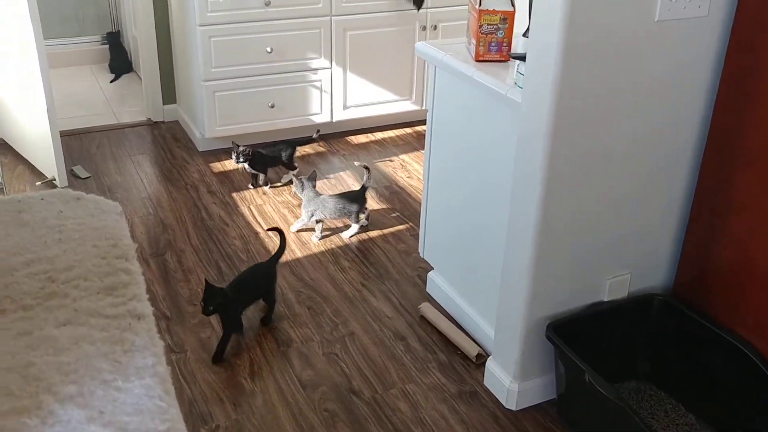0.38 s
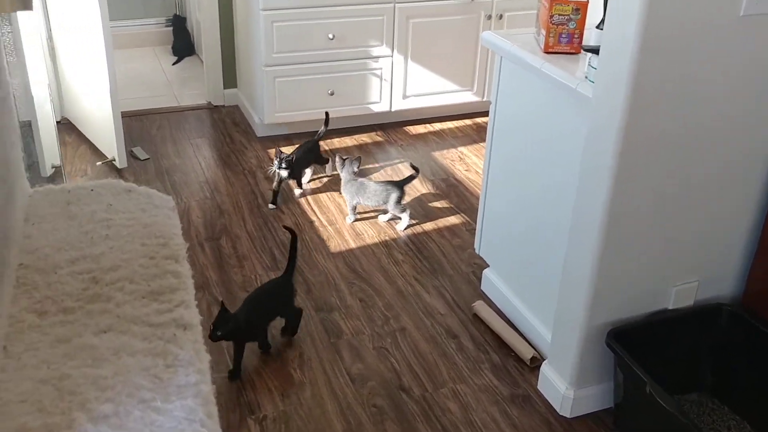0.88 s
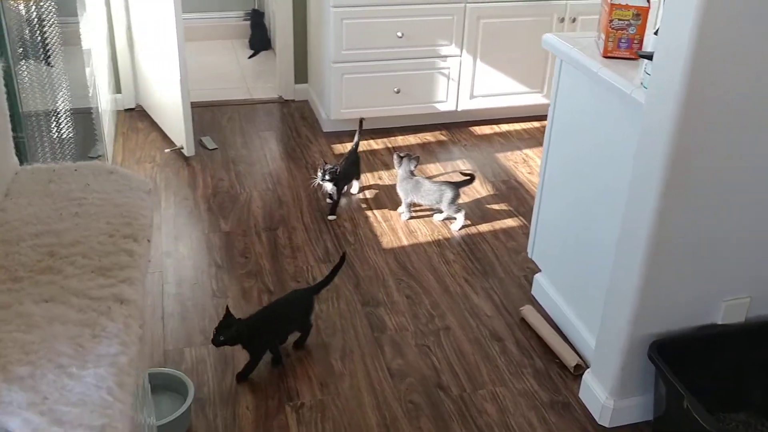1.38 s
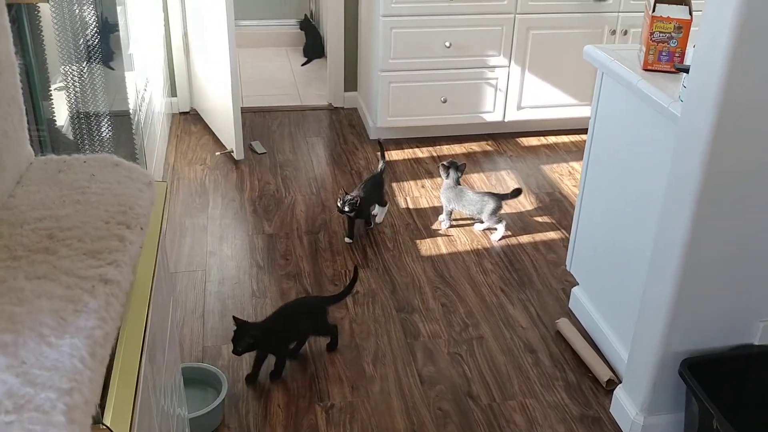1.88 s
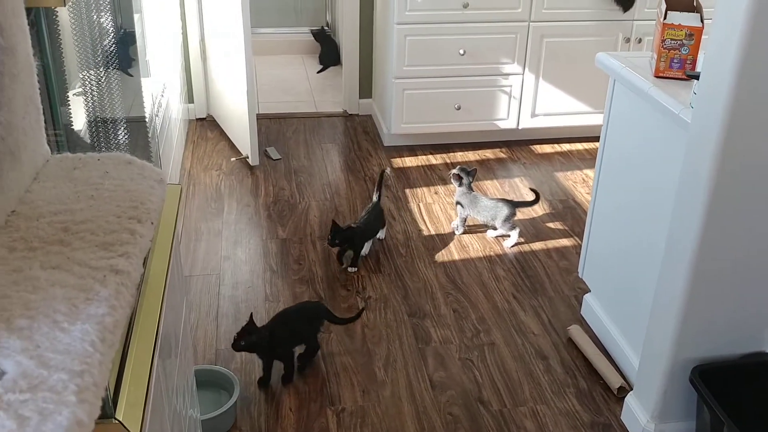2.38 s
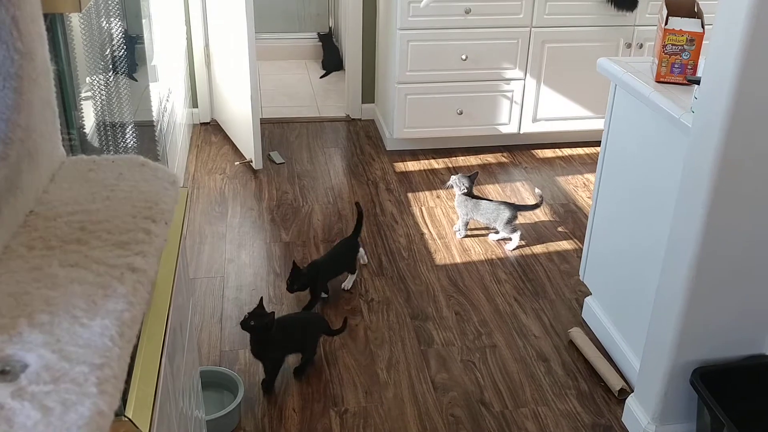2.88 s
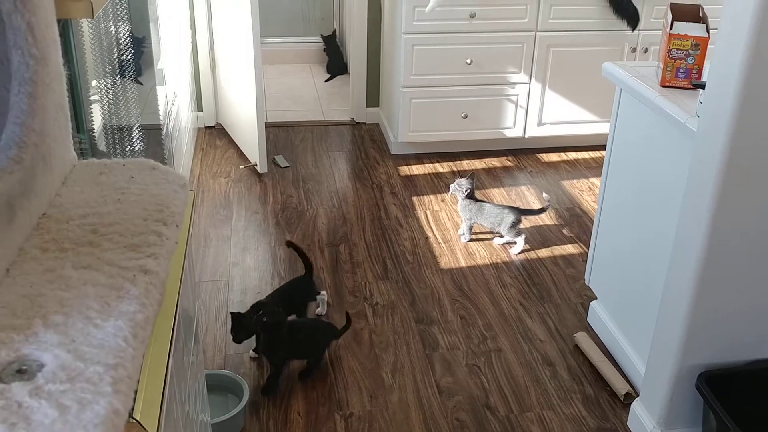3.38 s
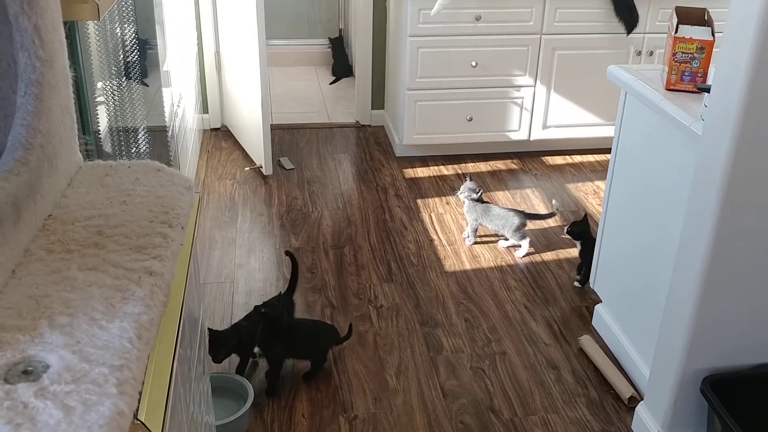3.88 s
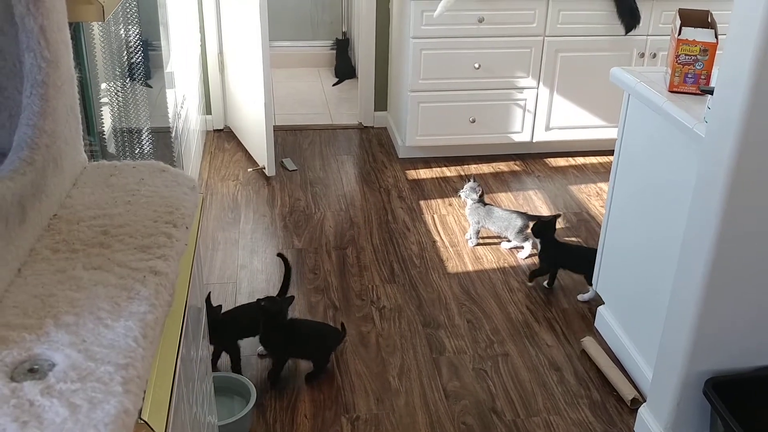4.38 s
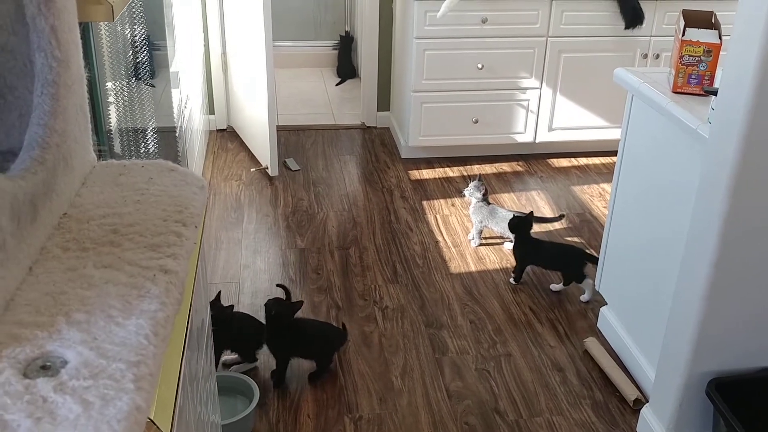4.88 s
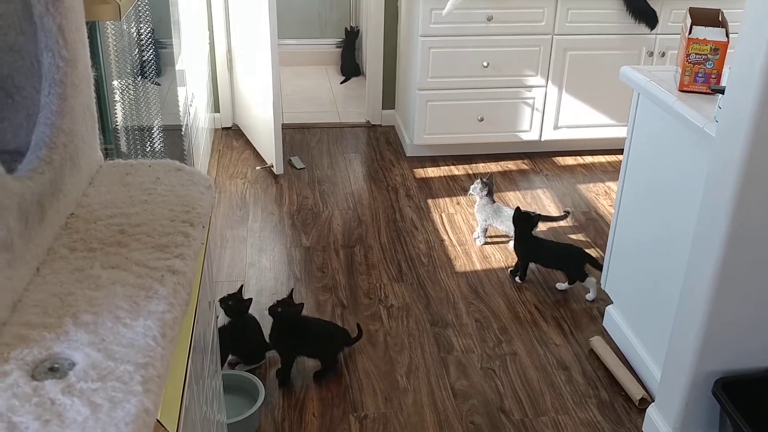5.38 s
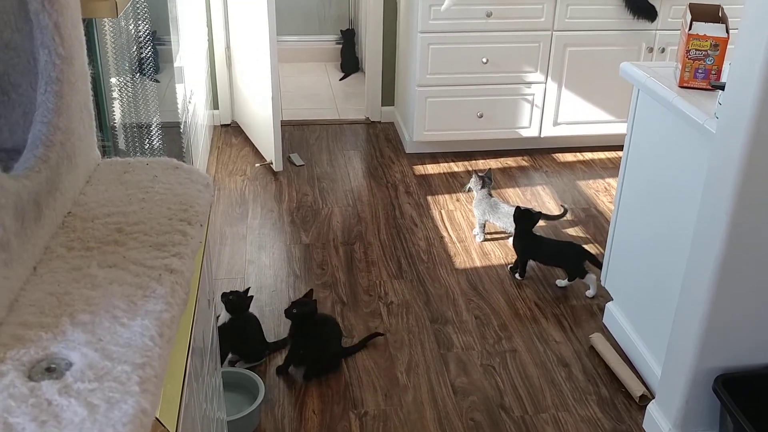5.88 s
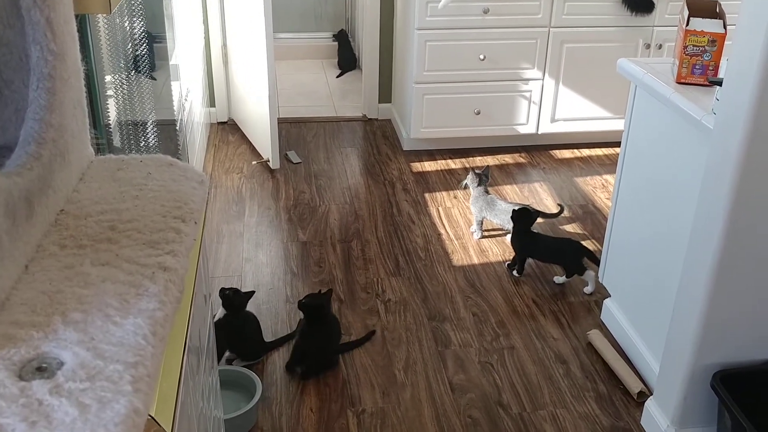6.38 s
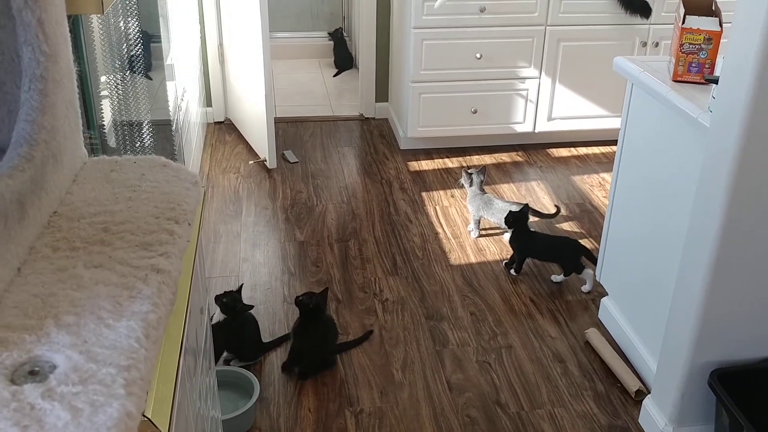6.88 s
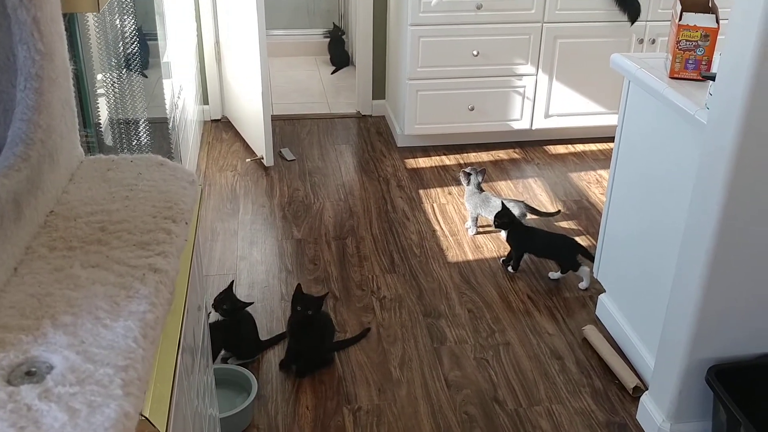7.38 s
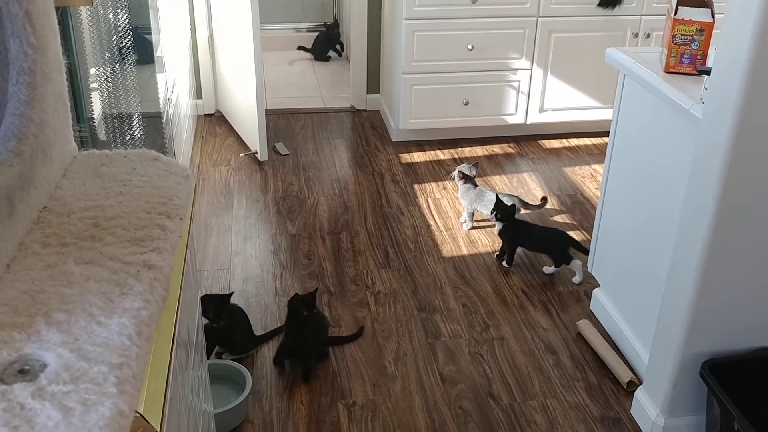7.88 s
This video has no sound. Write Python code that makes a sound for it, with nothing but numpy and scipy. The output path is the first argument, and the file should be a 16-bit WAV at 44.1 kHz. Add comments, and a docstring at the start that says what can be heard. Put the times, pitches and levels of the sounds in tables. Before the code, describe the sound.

In a bare, echoing kitchen, kittens patter over hard flooring with bright, light claw ticks and soft paw scuffs that thin out. A sudden heavy wooden knock booms through the floor, followed by a short clatter. After a quiet gap comes a second, weaker clatter, then five quick squeaky lip kisses. A handheld stereo microphone at some distance picks up mostly room reflections over low, quiet room tone.

```python
"""Kittens pad across a hard laminate floor in a bare kitchen; claws tick and paws scuff, each a flurry of clicks.
Soft paw thuds and hard wood knocks are clicks too; a heavy knock rings the floor, a door part clatters twice.
Five short squeaky kisses, probably lips calling the kittens, are dragged-out clicks through three resonances.
All these contacts are heard mostly through the room's echoes.
Behind them lie a faint noise rustle, a low rumble with bumps, and a steady noise room tone."""
import sys
import numpy as np
from scipy import signal
from scipy.fft import rfft, irfft, next_fast_len
from scipy.io import wavfile
from scipy.ndimage import uniform_filter1d

SR = 44100
rng = np.random.default_rng(int(sys.argv[2]) if len(sys.argv) > 2 else 0)


def materialize(psi):
    """Save the field psi as 16-bit PCM at rate SR to the path in sys.argv[1].

    A 1-D psi becomes a single channel; in a 2-D psi each row is a channel.
    """
    bounded = np.clip(np.atleast_2d(psi).T, -1, 1)
    quanta = np.round(bounded * 32767).astype(np.int16)
    wavfile.write(sys.argv[1], SR, quanta)


N = 352359   # length in samples
LEAD_IN = 512   # samples of silence ahead of each room response, so that filters start cleanly


def from_db(db):
    """Decibels to gain."""
    return 10 ** (np.asarray(db) / 20)


def rms_one(x):
    """Scale to rms 1."""
    return x / np.sqrt(np.mean(x ** 2) + 1e-20)


def at_hz(points, hz):
    """Read a table on a log-frequency axis."""
    table_hz, value = np.array(points).T
    return np.interp(np.log(hz + 1), np.log(table_hz), value)


def in_time(rows):
    """Read a curve at every sample."""
    s, value = np.transpose(rows)
    return np.interp(np.arange(N) / SR, s, value)


def coloured(x, spectrum):
    """Give a sound the colour of a spectrum table."""
    length = x.shape[-1]
    size = next_fast_len(length + 4096)
    hz = np.arange(size // 2 + 1) * SR / size
    return irfft(rfft(x, size) * from_db(at_hz(spectrum, hz)), size)[..., :length]


# How alike left and right are. Each row: frequency in Hz, correlation from -1 to 1.
LEFT_RIGHT_LIKENESS = [(100, 0.91), (250, 0.83), (500, 0.56), (1000, -0.085), (3000, -0.061),
                       (12000, -0.11)]


def stereo(mid, side):
    """Two unrelated sounds become a pair that is alike in the bass and nearly unrelated in the treble."""
    alike = [(hz, np.clip(c, -.99, .995)) for hz, c in LEFT_RIGHT_LIKENESS]
    mid = coloured(mid, [(hz, 10 * np.log10(1 + c)) for hz, c in alike])
    side = coloured(side, [(hz, 10 * np.log10(1 - c)) for hz, c in alike])
    return np.array([mid + side, mid - side]) / np.sqrt(2)


def steady(spectrum):
    """Stereo noise of a given colour, rms 1."""
    return rms_one(stereo(*coloured(rng.standard_normal((2, N)), spectrum)))


# How long the room rings. Each row: frequency in Hz, time to fall 60 dB in seconds.
ROOM_DECAY = [(250, 0.54), (1000, 0.38), (2000, 0.39), (3300, 0.34), (5000, .33), (9000, 0.28)]
# Walls and ceiling. Each row: shortest delay in seconds, level in dB over the direct level.
WALL_ECHOES = [(.008, -10.5), (0.018, -8.5), (0.0183, -4.5), (0.0208, 0), (.027, 0)]


def room_response(direct_db):
    """Direct sound and a few clear echoes, with a dense wash that piles up and dies, treble first."""
    buildup_s, grain_db = 0.0055, 3
    t = np.arange(SR // 2) / SR
    spikes = np.minimum(rng.exponential(1, len(t)), 4)
    grain = from_db(grain_db * spikes * np.exp(-t / 0.034))   # roughest at the start
    echoes = rng.standard_normal((2, len(t))) * grain
    wash = 0
    edges = 40 * 2 ** np.arange(0, 9.1, 1 / 3)   # third octaves, Hz
    for low, high in zip(edges, edges[1:]):
        band = signal.sosfilt(signal.butter(2, [low, high], "band", fs=SR, output="sos"), echoes)
        wash = wash + band * from_db(-60 * t / at_hz(ROOM_DECAY, np.sqrt(low * high)))
    spectrum = rfft(wash * (1 - np.exp(-t / buildup_s)))
    smooth_power = uniform_filter1d(np.abs(spectrum) ** 2, size=50)
    out = irfft(spectrum / np.sqrt(smooth_power), len(t))   # no colour of its own
    out *= np.clip((t[-1] - t) * 20 - 1, 0, 1)   # the wash fades out fully
    for delay, db in [(0.00047, 0.0095)] + list(WALL_ECHOES):   # the direct sound comes first
        lags = np.round((delay + 0.0011 * rng.random(2)) * SR).astype(int)
        out[[0, 1], lags] += from_db(direct_db + db) * rng.choice([-1, 1], 2)
    return stereo(*np.pad(out, [(0, 0), (LEAD_IN, 0)]))


def contacts(seconds, db, lengths, dragged=False):
    """Each contact is a flurry of tiny clicks, dying away or dragged out, with a set total energy."""
    out = np.zeros(N + 8192)
    t = np.arange(8192) / SR   # no contact outlasts this
    clicks_per_s = 9000 if dragged else 2500
    for s, level_db, length in zip(seconds, db, lengths):
        clicks = rng.standard_normal(len(t)) * (rng.random(len(t)) < clicks_per_s / SR)
        clicks[0] = 1
        if dragged:
            shape = np.clip(1 - (t / length) ** 3, 0, 1)
        else:
            shape = np.exp(-t / max(length, .0005))
        spectrum = rfft(clicks * shape)
        smooth_power = uniform_filter1d(np.abs(spectrum) ** 2, size=24)
        clicks = irfft(spectrum / np.sqrt(smooth_power)) * (shape > .001)   # even in colour
        at = round(s * SR)
        out[at:at + len(t)] += from_db(level_db) * clicks / np.sqrt(np.sum(clicks ** 2))
    return out[:N]


# Treble colour of the microphone. Each row: frequency in Hz, gain in dB.
MICROPHONE_COLOUR = [(6000, 7), (7200, 5.5), (8700, 15), (9500, 7.5), (10600, -23.5), (11600, -11),
                     (13000, -8), (16000, -11)]


def in_room(source, spectrum, room):
    """Colour and echoes; a unit click reaches rms 1 over its loudest 10 ms."""
    response = coloured(coloured(room, spectrum), MICROPHONE_COLOUR)
    loudest = np.sqrt(uniform_filter1d(np.mean(response ** 2, axis=0), size=441).max())
    return signal.fftconvolve(source[None], response / loudest, axes=1)[:, LEAD_IN:LEAD_IN + N]


def struck(seconds, lengths, layers, direct_db, count):
    """Contacts are dealt in turn to several places in the room, each with echoes of its own."""
    out = 0
    for place in range(count):
        room = room_response(direct_db)
        mine = slice(place, None, count)
        for db, spectrum in layers:
            clicks = contacts(seconds[mine], db[mine], lengths[mine])
            out = out + in_room(clicks, spectrum, room)
    return out


STEP_DIRECT_DB = -10.5   # direct sound against the wash, for steps and scuffs
# Claw and paw colours. Each row: frequency in Hz, relative level in dB per Hz.
CLAW_COLOUR = [(1200, -46), (1900, -12), (2700, -2), (4500, 2), (7000, 5), (10000, 8), (12500, 7),
               (16000, 1.5)]
PAW_COLOUR = [(400, -2), (1000, -5), (2000, 1.5), (3500, -6), (6000, -14), (10000, -45)]
# Footfalls and a few strong early echoes of them, each row one tick and scuff.
# Each row: start in seconds, claw tick in dB, paw scuff in dB.
TICKS_AND_SCUFFS = [(0.071, -48, -61), (0.0933, -45, -84), (0.3535, -36.5, -55), (0.6768, -39.5, -61),
                    (0.87, -68, -78), (0.941, -52, -69), (0.9627, -41.5, -62), (1.236, -66.5, -71),
                    (1.288, -39.5, -62), (1.574, -38, -57), (1.8267, -54, -64), (1.8667, -50, -64),
                    (2.152, -61, -65), (2.201, -50.5, -44.5), (2.421, -56, -61), (3.073, -54, -88),
                    (3.1571, -89, -55.5), (3.262, -63, -68), (3.463, -48, -57), (3.482, -45, -49.5),
                    (3.759, -61.5, -80), (4.233, -61.5, -72.5), (4.926, -43.5, -47), (5.364, -64.5, -61.5),
                    (5.639, -54, -68)]


def steps():
    """A bright claw tick and a duller paw scuff sound together in each row, both dying in about 2 ms."""
    s, claw_db, paw_db = np.transpose(TICKS_AND_SCUFFS)
    decay_s = np.full(len(s), 0.0022)
    layers = [(claw_db, CLAW_COLOUR), (paw_db, PAW_COLOUR)]
    return struck(s, decay_s, layers, STEP_DIRECT_DB, count=4)


# Paws dragged over the boards.
# Each row: start in seconds, bright part in dB, dull part in dB, length in seconds (cut at 0.186).
PAW_DRAGS = [(0.323, -55, -61, 0.033), (0.348, -38.5, -62, 0.06), (0.583, -64, -59.5, 0.085),
             (0.818, -64, -58.5, 0.17), (1.554, -53, -62, 0.021), (2.42, -55.5, -49, 0.12),
             (2.526, -76, -70, 0.026), (2.861, -63, -64.5, 0.22), (3.071, -66, -58, 0.12),
             (3.159, -89, -62, 0.049), (3.811, -71, -62, 0.027), (4.48, -58, -71, 0.13),
             (4.927, -44.5, -51.5, 0.046), (6.754, -58, -45, 0.057)]


def scuffs():
    """A paw sliding on the floor: the same colours as a step, drawn out."""
    s, bright_db, dull_db, length = np.transpose(PAW_DRAGS)
    room = room_response(STEP_DIRECT_DB)
    bright = in_room(contacts(s, bright_db, length, dragged=True), CLAW_COLOUR, room)
    dull = in_room(contacts(s, dull_db, length, dragged=True), PAW_COLOUR, room)
    return bright + dull


# Mid clatter, hollow part and bright edge. Each row: frequency in Hz, relative level in dB per Hz.
CLATTER_COLOUR = [(400, 0.5), (800, -1), (1500, 8.5), (2400, 3.5), (3500, -7), (6000, -29), (10000, -37)]
HOLLOW_COLOUR = [(150, -37), (250, -7.5), (330, 4), (440, 10), (560, -1), (800, 4), (1200, -4),
                 (2000, -23.5)]
EDGE_COLOUR = [(2000, -11.5), (4000, 2.5), (9000, -7.5), (11000, -12)]
# Soft hollow paw thuds, then a faint clatter and hard knocks on wood. Each row: start in seconds,
# clatter in dB, hollow part in dB, bright part in dB, decay constant of the contact in seconds.
THUDS_AND_KNOCKS = [(2.533, -64.5, -56.5, -80, 0.006), (3.165, -62, -54, -83, 0.0069),
                    (3.844, -57, -67, -83, 0.0051), (4.7125, -23.5, -30, -32.5, 0.0053),
                    (4.745, -28.5, -37, -44, 0.031), (5.097, -31, -41, -45.5, 0.011),
                    (5.1326, -38.5, -43, -67, 0.016), (5.168, -34, -41.5, -64, 0.0068),
                    (6.685, -36.5, -43, -62, 0.008), (6.724, -42, -48.5, -57, 0.0044),
                    (6.747, -44, -48.5, -49.5, 0.0071)]


def thuds_and_knocks():
    """Paw thuds and wood on wood share three colours, mid, hollow and bright, under strong echoes."""
    s, clatter_db, hollow_db, bright_db, decay_s = np.transpose(THUDS_AND_KNOCKS)
    layers = [(clatter_db, CLATTER_COLOUR), (hollow_db, HOLLOW_COLOUR), (bright_db, EDGE_COLOUR)]
    # little direct sound: the knocks come from round a corner
    return struck(s, decay_s, layers, direct_db=-15.5, count=3)


# Low resonances of the floor. Each row: frequency in Hz, relative level in dB, time to fall 60 dB in seconds.
FLOOR_RESONANCES = [(58.5, -7, 0.39), (75.7, 6, 0.082), (126.4, -2.5, 0.26), (149.2, 5, 0.21),
                    (205, -5, 0.37), (263, -9.5, 0.38), (304.4, -13, 0.43)]
# Pushes on the floor; the heavy knock lands in stages.
# Each row: start in seconds, strength in dB, push length in seconds.
FLOOR_PUSHES = [(0.232, -29, 0.02), (0.254, -44, 0.017), (4.708, -20.5, 0.0051), (4.716, -18, 0.006),
                (4.724, -11, 0.0045), (5.105, -52, 0.0037), (6.691, -50, 0.0066)]


def thumps():
    """Soft pushes set the low floor modes ringing, nearly alike in both ears."""
    push, out = np.full(N, 1e-18), 0
    for s, db, length in FLOOR_PUSHES:
        shape = np.hanning(max(round(length * SR), 3))
        at = round(s * SR)
        push[at:at + len(shape)] -= from_db(db) * shape / shape.sum()
    for hz, db, t60 in FLOOR_RESONANCES:
        r, w = from_db(-60 / (t60 * SR)), 2 * np.pi * hz / SR   # loss per sample, radians per sample
        ringing = signal.lfilter([0, np.sin(w)], [1, -2 * r * np.cos(w), r * r], push)
        out = out + from_db(db) * ringing
    # the microphone drops the deepest bass
    out = signal.sosfilt(signal.butter(6, 50, "high", fs=SR, output="sos"), out)
    side = from_db(-20.5) * np.roll(out, 90)   # a faint late copy, opposite in the two ears
    return out + side * [[1], [-1]]


# Overall tilt of the kisses. Each row: frequency in Hz, relative level in dB per Hz.
KISS_TILT = [(500, -8.5), (1800, -7.5), (2400, -5.5), (9000, 1), (10500, -7)]
# Five short squeaky kisses. Each row: start in seconds, level in dB, first resonance in Hz,
# second resonance in Hz, second level in dB and third level in dB against the first, before the tilt.
KISSES = [(6.927, -36, 3020, 5700, -5, -30), (7.091, -30.5, 2930, 5230, -5.5, -18.5),
          (7.262, -32, 3050, 5430, -3, -16.5), (7.405, -33, 2890, 5750, -14.5, -27),
          (7.569, -29.5, 3210, 5640, -8, -12)]


def kisses():
    """Squeaky kisses, probably lips calling the kittens: bursts of clicks through three resonances."""
    width_hz, third_over_second, length_s = 810, 1.474, 0.016
    hiss_db = -23.5   # what escapes between the resonances
    out, hz = 0, np.geomspace(300, 16000, 120)
    for s, db, first_hz, second_hz, second_db, third_db in KISSES:
        resonances = [(first_hz, 0), (second_hz, second_db), (third_over_second * second_hz, third_db)]
        peaks = sum(from_db(d) / (1 + np.abs(2 * (hz - centre) / width_hz) ** 2.2)
                    for centre, d in resonances)
        colour = 20 * np.log10(peaks + from_db(hiss_db)) + at_hz(KISS_TILT, hz)
        burst = contacts([s], [db], [length_s], dragged=True)
        out = out + in_room(burst, np.transpose([hz, colour]), room_response(direct_db=-31))
    return out


# Faint rustle while the animals move. Each row: time in seconds, level in dB.
RUSTLE_LEVEL = [(0.0, -92), (0.84, -78), (1.09, -77.5), (4.47, -78.5), (4.88, -57.5), (5.07, -97),
                (5.41, -74), (6.18, -85), (6.74, -69.5), (6.9, -74), (7.4, -72), (7.99, -81)]


def rustle():
    """Claw-coloured noise that rises and falls along a level curve."""
    noise = rms_one(coloured(steady(CLAW_COLOUR), MICROPHONE_COLOUR))
    return from_db(in_time(RUSTLE_LEVEL)) * noise


# Colour of the rumble. Each row: frequency in Hz, relative level in dB per Hz.
RUMBLE_COLOUR = [(25, -34), (45, 4), (80, 3), (150, -8), (300, -6), (600, -35)]
# Low bumps carried by floor and hand.
# Each row: time of the top in seconds, level in dB, length from the top to 1/e in seconds.
LOW_BUMPS = [(0.036, -58, 0.11), (0.315, -49.5, 0.084), (0.85, -60.5, 0.25), (1.318, -55, 0.069),
             (1.623, -55.5, 0.036), (1.834, -54.5, 0.079), (2.19, -58, 0.15), (2.496, -55.5, 0.11),
             (2.704, -58, 0.033), (2.856, -59, 0.029), (2.999, -62, 0.039), (3.19, -54, 0.079),
             (3.48, -63, 0.045), (3.747, -63.5, 0.14), (4.23, -61, 0.15), (4.481, -67.5, 0.048),
             (5.646, -61, 0.032), (5.925, -66, 0.25), (6.353, -60.5, 0.096), (6.524, -62, 0.049),
             (6.756, -72, 0.19), (7.257, -60, 0.044), (7.451, -60.5, 0.05), (7.97, -64.5, 0.1)]


def bumps():
    """Low rumble that wavers by chance and swells smoothly at each bump."""
    rumble_db, waver_db, waver_hz = -73, 2.5, 15   # between the bumps
    t = np.arange(N) / SR
    slow = signal.butter(2, waver_hz, fs=SR, output="sos")
    waver = rms_one(signal.sosfilt(slow, rng.standard_normal(N)))
    swells = sum(from_db(db) * np.exp(-((t - s) / length) ** 2) for s, db, length in LOW_BUMPS)
    level = from_db(rumble_db + waver_db * waver) + swells
    return level * steady(RUMBLE_COLOUR)


# Colour of the quiet house. Each row: frequency in Hz, relative level in dB per Hz.
ROOM_TONE_COLOUR = [(18, -52), (30, -39), (81, -1.5), (109, -10), (157, -9), (252, -21), (426, -13),
                    (632, -21.5), (740, -19), (844, -22), (913, -22.5), (2680, -33), (5040, -36.5),
                    (16000, -46.5)]


def room_tone():
    """Steady noise, strongest in a low band near 81 Hz."""
    return from_db(-62.5) * steady(ROOM_TONE_COLOUR)


def scene():
    """All sources as they reach the two microphones."""
    return steps() + scuffs() + thuds_and_knocks() + thumps() + kisses() + rustle() + bumps() + room_tone()


def band_limit(x):
    """A steep low-pass at the top of the band."""
    return signal.sosfilt(signal.butter(12, 16190, fs=SR, output="sos"), x)


def record(dry):
    """A steep low-pass removes the top above 16.2 kHz."""
    cut = signal.sosfilt(signal.cheby2(14, 60, 16200, fs=SR, output="sos"), dry)
    return band_limit(cut)


dry = scene()
out = record(dry)
materialize(out)
```